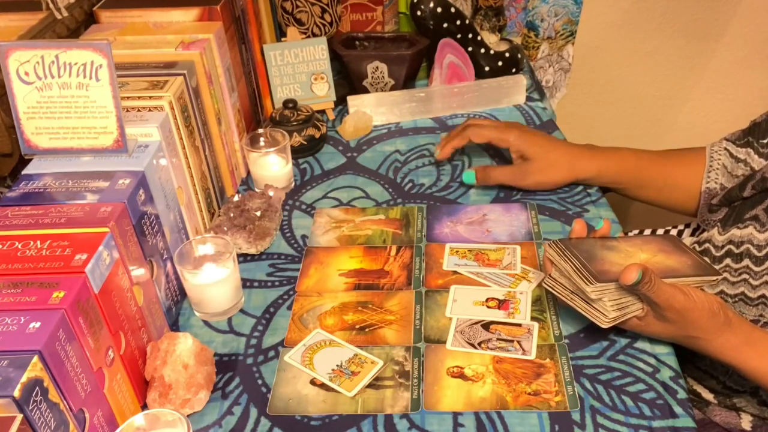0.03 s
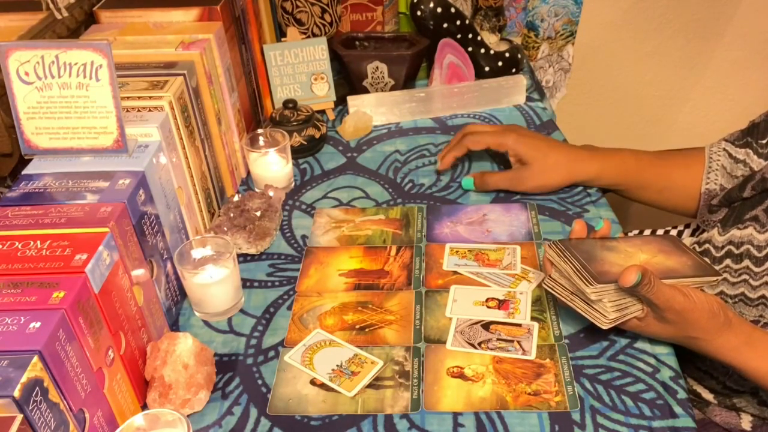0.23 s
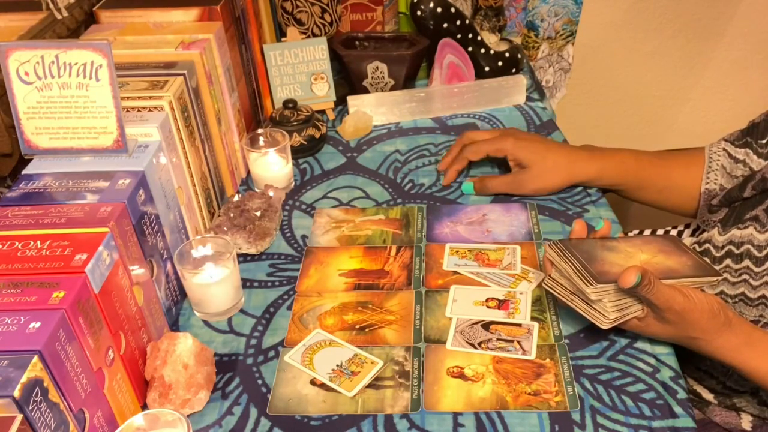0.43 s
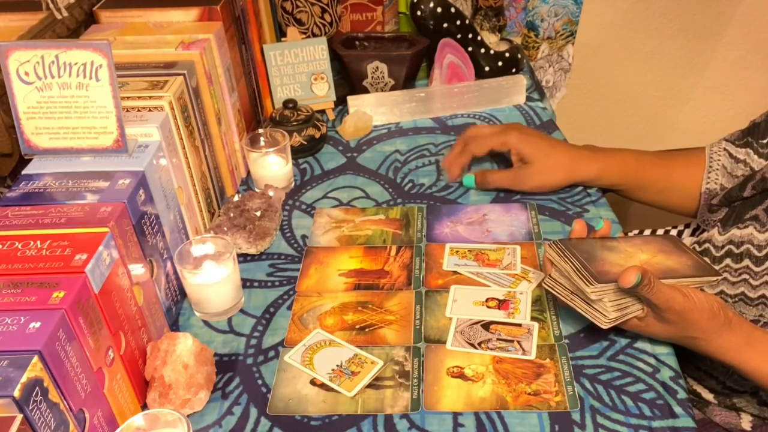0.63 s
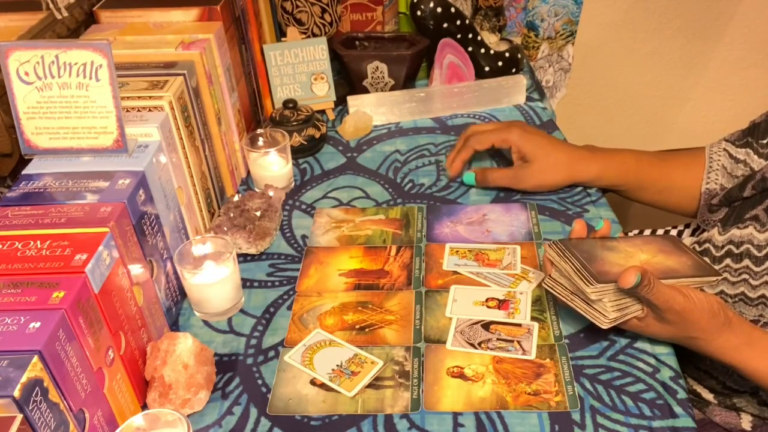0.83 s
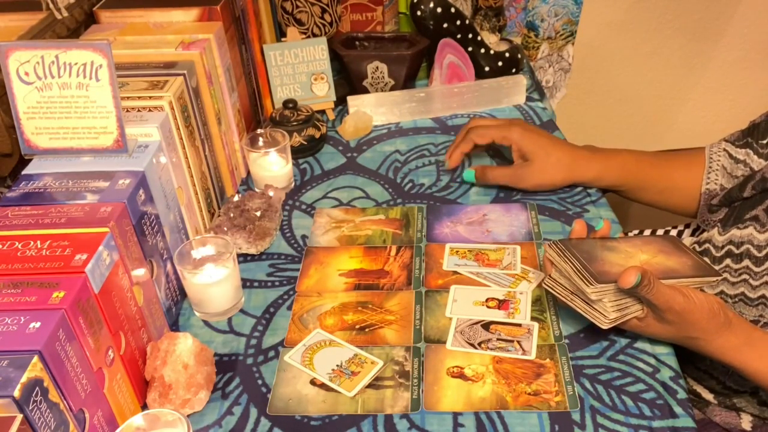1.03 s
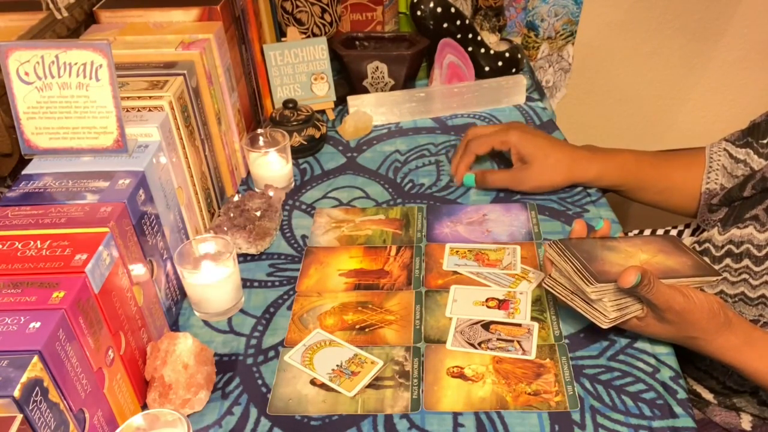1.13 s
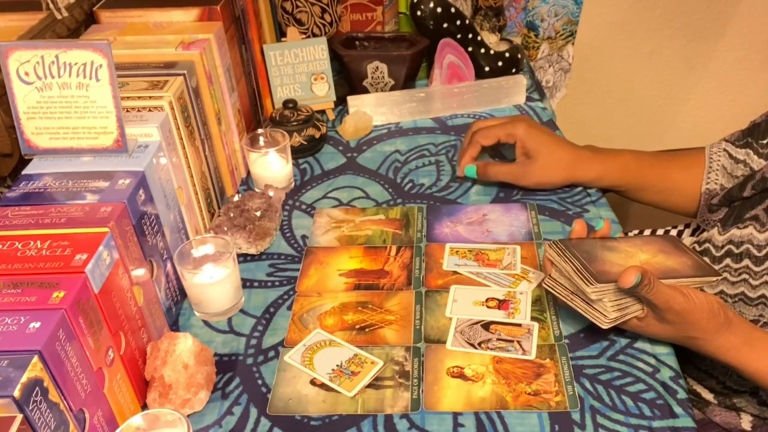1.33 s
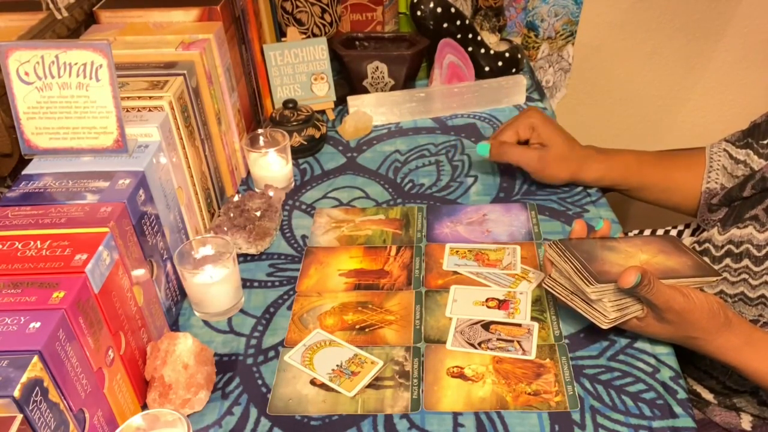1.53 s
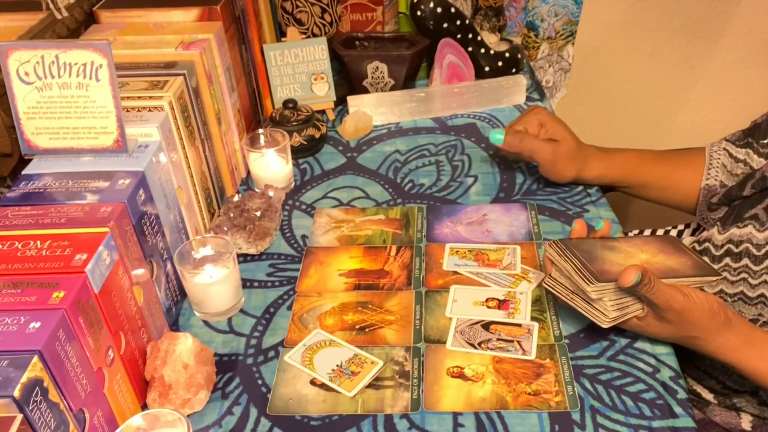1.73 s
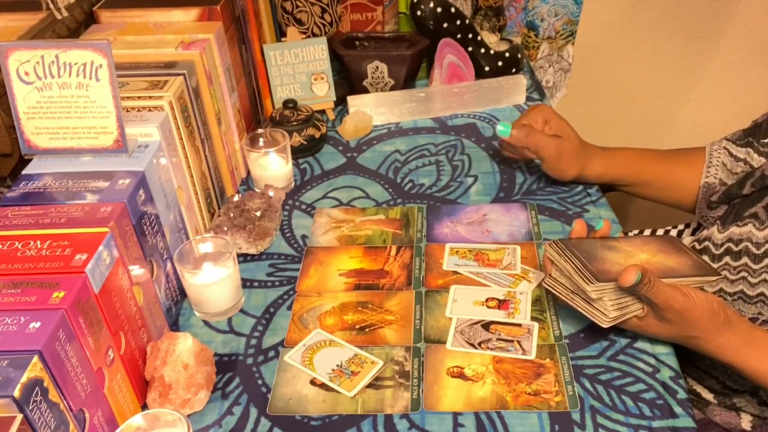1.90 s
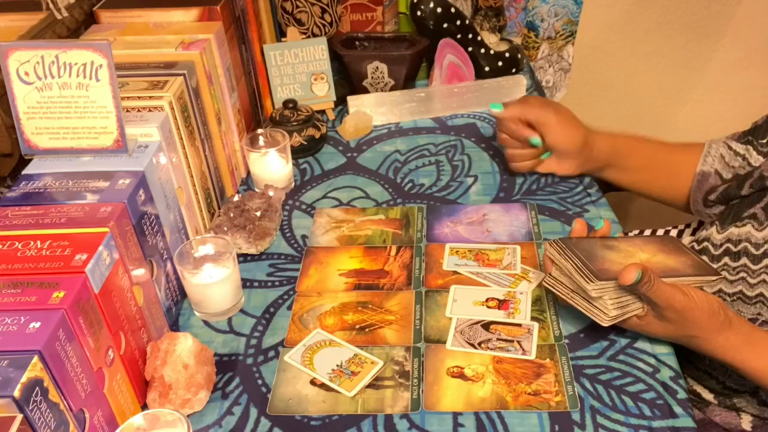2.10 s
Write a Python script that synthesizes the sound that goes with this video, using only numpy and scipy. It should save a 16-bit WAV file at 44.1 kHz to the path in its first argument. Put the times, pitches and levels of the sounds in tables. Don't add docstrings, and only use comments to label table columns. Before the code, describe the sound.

Fingertips drum on a cloth-covered wooden table: dull, short thuds at about 0.07, 0.32, 0.59 and 0.82 seconds, a stronger, brighter double tap at 1.07, then at 1.33 a light tap with a crisp, scratchy nail flick. Faint sleeve brushing trails it, a tiny tick comes at 1.66, and soft cloth rustles near 2.0. Close stereo, small dry room, low rumble and faint hiss.

```python
import sys
import numpy as np
from scipy import signal
from scipy.fft import rfft, irfft, next_fast_len
from scipy.io import wavfile
from scipy.ndimage import map_coordinates

SR = 44100
rng = np.random.default_rng(int(sys.argv[2]) if len(sys.argv) > 2 else 0)


def generate_wav(signal):
    frames = np.transpose(np.atleast_2d(signal))
    scaled = np.clip(frames, -1, 1) * 32767
    pcm = np.round(scaled).astype(np.int16)
    wavfile.write(sys.argv[1], SR, pcm)


def magnitude_from_level(level_db):
    exponent = np.asarray(level_db, float) / 20
    return 10 ** exponent


N = 95300

# [t/s, level/dB, frame sway/dB, middle modes/dB, upper modes/dB]
BLOWS = [
    (0.0734, -29, -1.5, -27, -30.5),
    (0.317, -37, 9, -14, -29),
    (0.5903, -28, 7.5, -5.5, -8),
    (.8245, -30.5, 4.5, 3.5, -2),
    (1.0709, -31, -10, 5.5, 0.5),
    (1.0774, -23, -8.5, 3.5, -6),
    (1.3339, -40.5, 0, 7.5, 4),
]
# [f/Hz, level/dB, time to fall 60 dB/s]
TABLE_MODES = [(58, -1.5, .19), (70, -3.5, 0.027), (96.1, -5, 0.28), (122.1, 0.5, 0.17),
               (164.7, -15.5, .17), (238, 4.5, 0.051), (337.3, -13.5, 0.17), (492, -19.5, 0.12),
               (483.5, 10.5, 0.016), (538.5, 10, 0.016), (676, -10, 0.054), (750, -13, 0.052),
               (1187, -10.5, 0.016), (1452, -10, 0.012)]
MODE_FAMILY = [1, 1, 0, 0, 2, 2, 2, 3, 3, 3, 3, 3, 3, 3]
HAND_SIDE = [1, 1, 1, 1, -1, 1, -1, 1, 1, 1, -1, 1, 1, -1]
CREST_S, LAG_TURNS = 0.0157, 0.42
RISE_TURNS, SCATTER_DB = 1.32, 1.78

# [t/s, peak level/dB, centre f/Hz]
NAIL_TICKS = [(0.0703, -54, 3400), (0.0723, -53, 1380), (.072, -49.5, 583), (0.3134, -57, 1700),
              (0.5865, -53.5, 3660), (0.8242, -56, 4500), (0.823, -55, 3000), (1.0715, -41, 3880),
              (1.0767, -50, 1920), (1.0773, -47, 4400), (1.1374, -59.5, 3330), (1.334, -32, 1620),
              (1.337, -31.5, 736), (1.6556, -56.5, 7400), (1.656, -63.5, 3600), (1.6555, -64, 12100)]
TICK_RISE_S, TICK_T60_S, TICK_WIDTH = 0.00075, 0.011, 0.33

# [t/s, level/dB, rise/s, time to fall 60 dB/s]
SCRAPES = [
    (1.3324, -42.5, 0.0025, 0.073),
    (1.3427, -30.5, 0.001, 0.045),
    (1.3459, -34, 0.0028, 0.031),
    (1.368, -54.5, 0.011, 0.21),
]
# [f/Hz, width/Hz, level/dB]
NAIL_RESONANCES = [(1280, 134, -1), (1505, 120, 2), (1733, 79, 3), (1890, 142, 2.5), (2297, 67, -3),
                   (2660, 310, -6), (3400, 550, -3), (3980, 880, -3.5), (4970, 850, -8.5),
                   (6820, 1040, -13.5), (11840, 1400, -19.5), (15300, 1600, -15)]
GRIT_DB, GRIT_PER_S = -0.5, 900

BRUSH_TIMES = [1.074, 1.139, 1.349, 1.385, 1.42, 1.955, 1.99, 2.065]
# [length/s, level/dB, tilt/dB per octave]
BRUSH_STROKES = [
    (0.017, -55.5, -11),
    (.012, -67, 0),
    (0.027, -64, -4),
    (0.073, -57.5, 0),
    (0.051, -60.5, 10),
    (0.057, -62.5, 0.5),
    (0.046, -60, 0),
    (0.036, -61, 11),
]
# [f/Hz, level/dB]
CLOTH_COLOUR = [(250, -14), (1500, 1), (2800, -12.5), (6000, -6.5), (9000, -8.5), (11500, -6.5),
                (14500, -8.5), (16000, -12.5)]

# [f/Hz, time to fall 60 dB/s]
ROOM_DECAY = [(100, .25), (500, 0.14), (2000, 0.14), (4000, 0.064), (14000, 0.12)]
ROOM_DB, FLICK_ROOM_DB, ROOM_GAP_S, ROOM_LOW_HZ = -4, -6.5, 0.004, 433

# [f/Hz, level/dB]
RUMBLE_COLOUR = [(20, -39.5), (42, -5), (58, -2.5), (75, -9.5), (100, -17.5), (117, -6.5), (150, -19.5),
                 (300, -29)]
# [f/Hz, level/dB]
HISS_COLOUR = [(88, -47.5), (150, -13.5), (346, -6.5), (631, -11.5), (1010, -15.5), (1110, -15.5),
               (1270, -17), (2280, -21.5), (15600, -29.5)]
# [f/Hz, likeness from -1 to 1]
LIKENESS = [(60, 1), (130, 0.27), (300, 0.24), (1000, -0.18), (3000, 0.2)]
RUMBLE_DB, HISS_DB, WHINE_HZ, WHINE_DB = -57.5, -67.5, 1074, -75

# [f/Hz, level/dB]
MID_COLOUR = [(8850, 1), (9500, -20), (10000, -23), (10300, 0.5), (13600, 1), (14500, -18), (15700, -20),
              (15800, -90)]
# [f/Hz, level/dB]
SIDE_COLOUR = [(11200, 2), (12000, -27), (12900, -31), (13200, 1), (14500, 3), (14900, -20), (15700, -10),
               (15800, -97)]
LOW_CUT_HZ = 35


def taps():
    out = np.zeros(N)
    hz, db, t60 = np.transpose(TABLE_MODES)[..., None]
    slow = np.array(MODE_FAMILY)[:, None] < 3
    lag = np.where(slow, hz * CREST_S - 1 / 4, LAG_TURNS)
    chance = rng.standard_normal((len(BLOWS), len(TABLE_MODES), 1))
    for (s, level, *shares), luck in zip(BLOWS, chance):
        t = np.clip(np.arange(N) / SR - s, 0, None)
        share_db = np.array([0, *shares])[MODE_FAMILY][:, None]
        gain_db = level + db + share_db + SCATTER_DB * luck
        swell = 1 - np.exp(-(t * hz / RISE_TURNS) ** 2)
        ringing = magnitude_from_level(gain_db - 60 * t / t60) * np.sin(2 * np.pi * (hz * t - lag))
        out += HAND_SIDE @ (swell * ringing)
    return out


def flick():
    t = np.clip(np.arange(N) / SR - np.array(SCRAPES)[:, :1], 0, None)
    _, db, rise, t60 = np.transpose(SCRAPES)[..., None]
    fade = magnitude_from_level(db - 60 * np.clip(t - rise, 0, None) / t60)
    stroke = np.sum(fade * np.clip(t / rise, 0, 1), 0)

    def body(f):
        return sum((-1) ** k * magnitude_from_level(db) * peak(f, hz, width)
                   for k, (hz, width, db) in enumerate(NAIL_RESONANCES))

    grit = rng.standard_normal(N) * magnitude_from_level(GRIT_DB * wobble(GRIT_PER_S)[0])
    return filtered(grit * stroke, body) / np.std(filtered(grit, body))


def ticks():
    out = np.zeros(N)
    for s, db, hz in NAIL_TICKS:
        t = np.arange(N) / SR - s
        noise = rng.standard_normal(N)
        grain = unit(filtered(noise, lambda f: peak(f, hz, hz * TICK_WIDTH) ** 3))
        fade = magnitude_from_level(db - 60 * np.abs(t) / TICK_T60_S)
        out += fade * np.clip(t / TICK_RISE_S, 0, 1) * grain
    return out


def sleeve():
    out = np.zeros((2, N))
    for s, (length, db, tilt) in zip(BRUSH_TIMES, BRUSH_STROKES):
        t = np.arange(N) / SR - s
        swell = np.exp(-(2 * t / length) ** 2) * magnitude_from_level(1.8 * wobble(120))
        colour = [(f, g + tilt * np.log2(f / 8000)) for f, g in CLOTH_COLOUR]
        out += magnitude_from_level(db) * swell * rush(colour, [(1000, 0.13)])
    return out


def room(x):
    hz, t, z = signal.stft(rng.standard_normal((2, SR // 2)), SR, nperseg=256)
    fade = magnitude_from_level(-60 * t / along(ROOM_DECAY, hz)[:, None])
    tail = signal.istft(z * fade, SR, nperseg=256)[1]
    late = np.pad(x, (round(ROOM_GAP_S * SR), 0))[None]
    return signal.fftconvolve(late, tail / np.linalg.norm(tail[0]), axes=1)[:, :N]


def room_tone():
    rumble = magnitude_from_level(RUMBLE_DB + 1.4 * wobble(5.35)) * rush([*RUMBLE_COLOUR, (400, -120)], LIKENESS)
    phase = np.array([[0], [2.3]])
    whine = np.sin(2 * np.pi * WHINE_HZ * np.arange(N) / SR + phase)
    whine = magnitude_from_level(WHINE_DB + 0.53 * wobble(5.5)) * whine
    hiss = magnitude_from_level(HISS_DB + 0.17 * wobble(1.9)) * rush(HISS_COLOUR, LIKENESS)
    return rumble + whine + hiss


def rush(spectrum, alike):
    def shares(hz):
        turn = np.arccos(np.clip(along(alike, hz), -1, 1)) / 2
        return magnitude_from_level(along(spectrum, hz)) * [np.cos(turn), np.sin(turn)]

    mid, side = filtered(rng.standard_normal((2, N)), shares)
    return unit(np.array([mid + side, mid - side]))


def placed(x, lead_s, pan_db, knee_hz=0):
    side = np.array([[1], [-1]])

    def path(f):
        turn = np.pi * np.clip(f - knee_hz, 0, None) * lead_s * side
        return magnitude_from_level(side * pan_db / 2) * np.exp(1j * turn)

    return filtered(x, path)


def peak(f, hz, width):
    return 1j * f * width / (hz * hz - f * f + 1j * f * width)


def filtered(x, response):
    m = next_fast_len(N + SR // 2)
    return irfft(rfft(x, m) * response(np.fft.rfftfreq(m, 1 / SR)), m)[..., :N]


def wobble(rate, channels=1):
    at = np.arange(N) * rate / SR
    return np.array([map_coordinates(rng.standard_normal(N // 8), [at]) for _ in range(channels)])


def along(points, hz):
    f, v = np.transpose(points)
    return np.interp(np.log(hz + 1), np.log(f + 1), v)


def unit(x):
    return x / np.sqrt(np.mean(x ** 2) + 1e-20)


def scene():
    table, nails, skid = taps(), ticks(), flick()
    near = placed(table, lead_s=0.00005, pan_db=2.5) + placed(nails, lead_s=0.00005, pan_db=2.7)
    near += placed(skid, lead_s=-0.00013, pan_db=5.1, knee_hz=3600)
    upper = filtered(table + nails, lambda f: 1j * f / (ROOM_LOW_HZ + 1j * f))
    echoes = magnitude_from_level(ROOM_DB) * room(upper) + magnitude_from_level(FLICK_ROOM_DB) * room(skid)
    return near + echoes + sleeve() + room_tone()


def roll_off(x):
    return signal.sosfilt(signal.butter(12, 15720, fs=SR, output="sos"), x)


def record(dry):
    def colour(f):
        low_cut = np.sqrt(1 + (LOW_CUT_HZ / (f + 1)) ** 8)
        return magnitude_from_level([along(MID_COLOUR, f), along(SIDE_COLOUR, f)]) / low_cut

    mid, side = filtered(np.array([dry[0] + dry[1], dry[0] - dry[1]]) / 2, colour)
    return roll_off(np.array([mid + side, mid - side]))


dry = scene()
out = record(dry)
generate_wav(out)
```